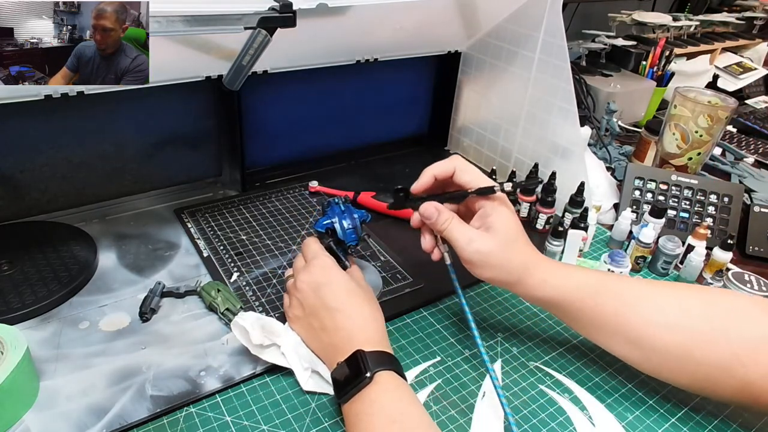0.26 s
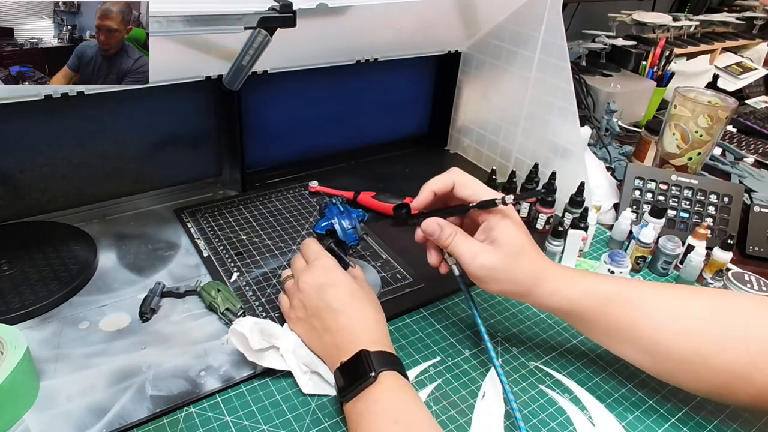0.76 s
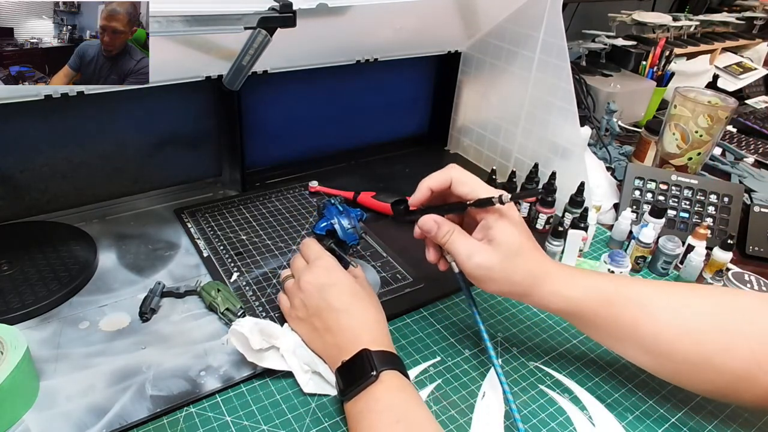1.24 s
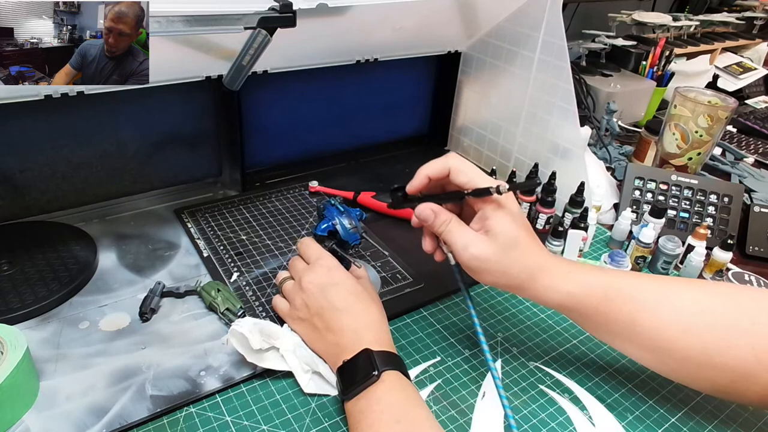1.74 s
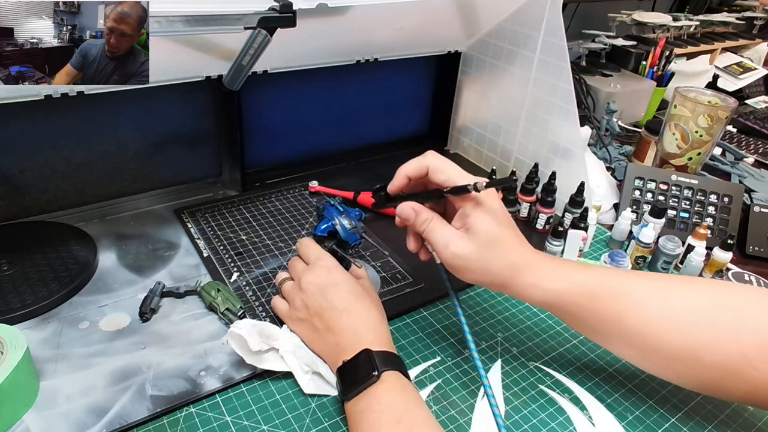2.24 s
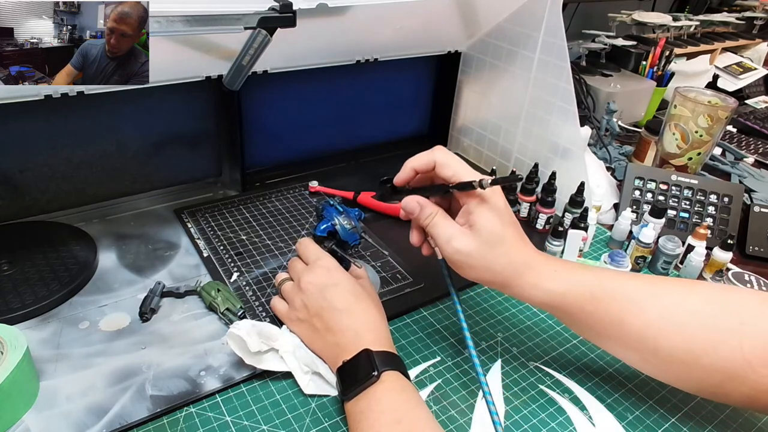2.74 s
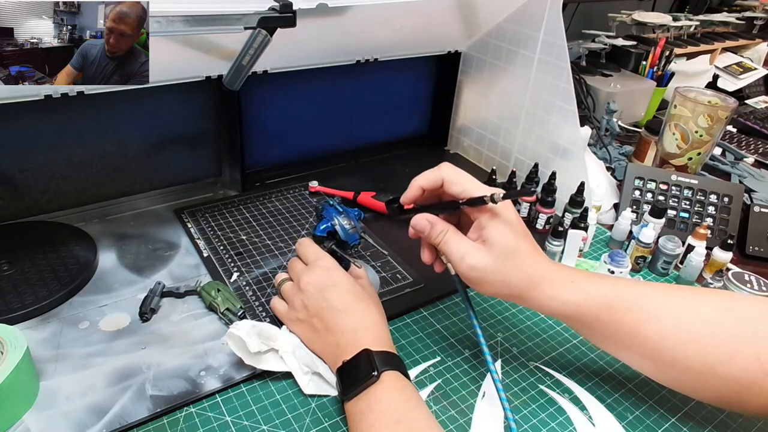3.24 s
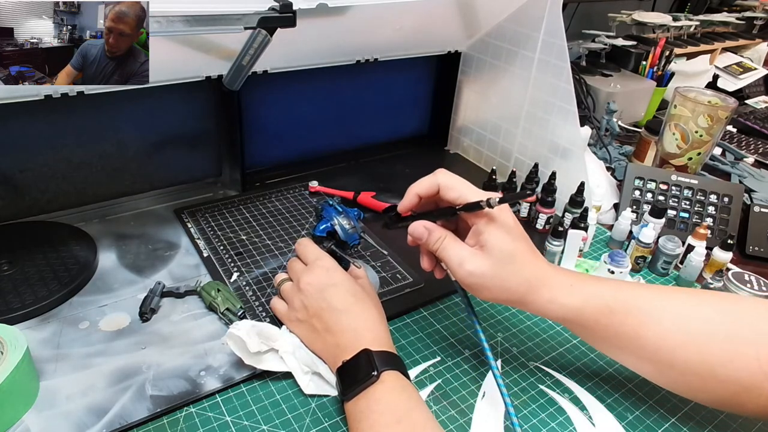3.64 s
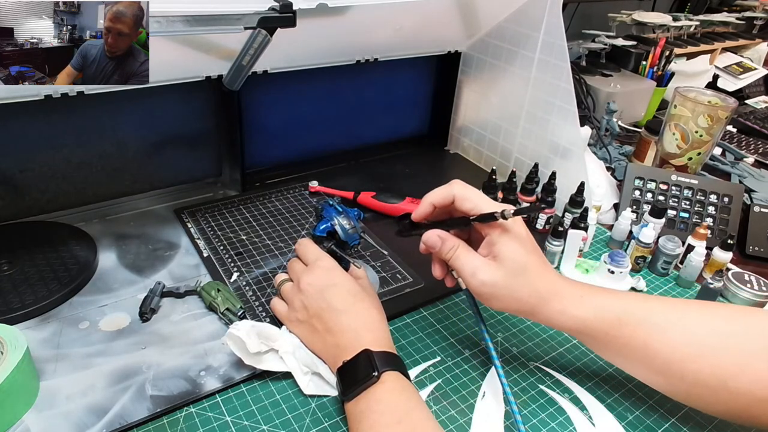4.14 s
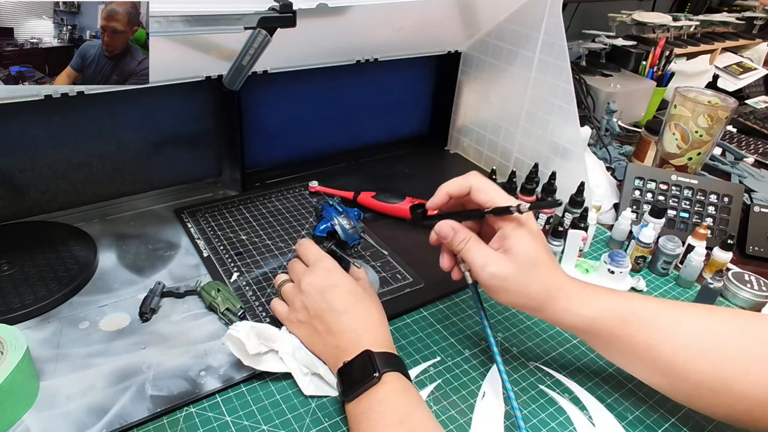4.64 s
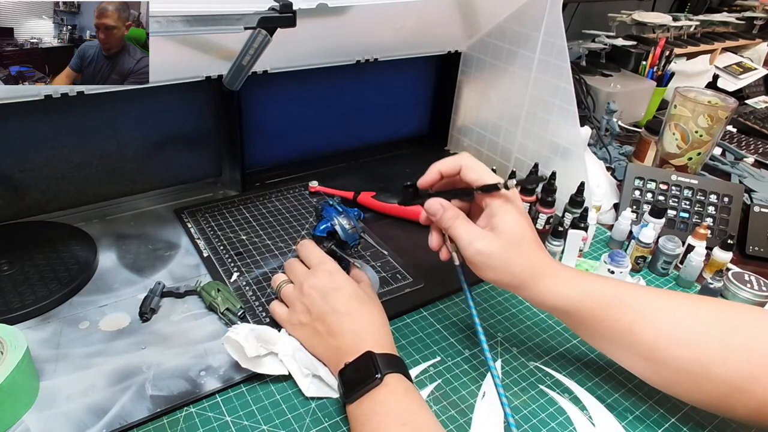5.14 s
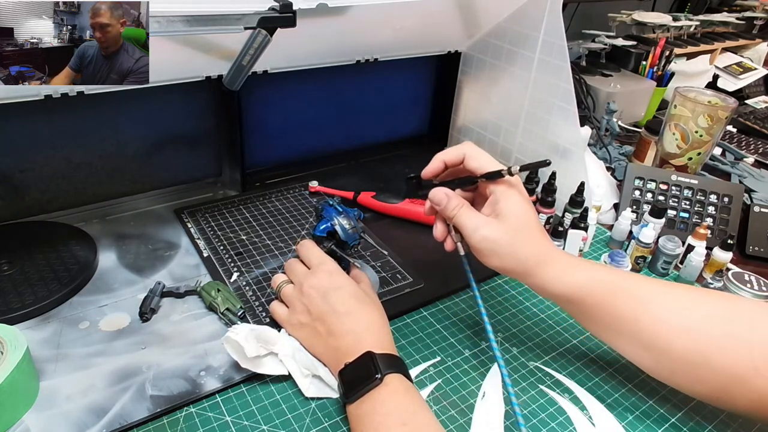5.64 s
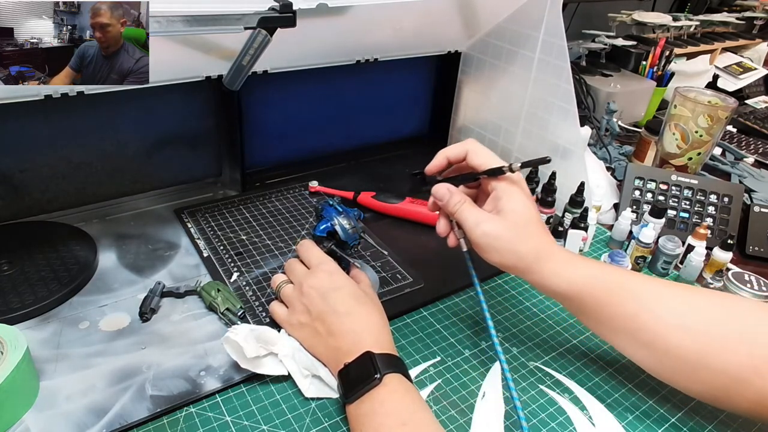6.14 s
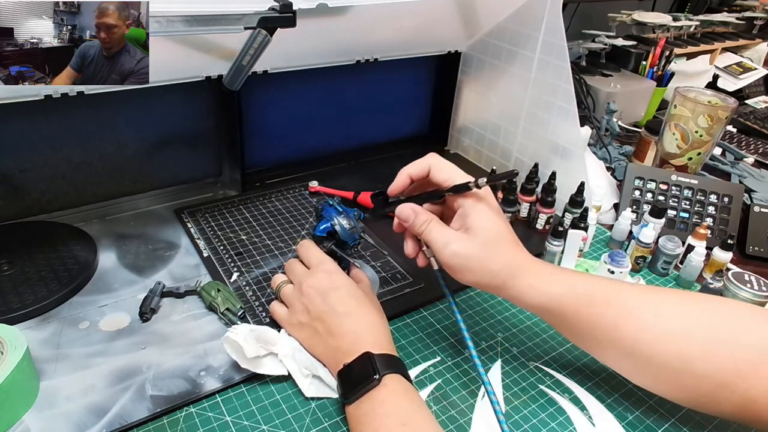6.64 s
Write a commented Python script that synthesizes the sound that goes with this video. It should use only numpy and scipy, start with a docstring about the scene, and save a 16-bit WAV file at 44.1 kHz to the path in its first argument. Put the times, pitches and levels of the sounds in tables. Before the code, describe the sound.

A close mono pickup at a hobby bench, with low room tone, faint steady tones and a thin, warbling electrical whine throughout. The tail of an earlier spray vanishes at the very start. From 0.16 to 0.52 seconds a longer airbrush burst hisses, breathy and hollow against a small part. Short puffs of under a fifth of a second or so follow near 0.9, 1.3, 1.7, 2.2, 2.6, 3.1, 3.5, 4.1, 4.6 and 5.1, then a slightly longer one at 5.4. Each opens with a thin valve chirp, then bright hiss and sizzle, with changing roar. Bursts around 5.1 to 6.2 sound softer and hollower. Soft rubs of the hands fall in some gaps; dull, low bumps appear from 3 seconds. After the 6.1 puff, a light, clustered smack comes near 6.5, then a final crisp burst at 6.73 to 6.95.

```python
"""An airbrush sprays a small plastic part in short bursts, in front of a bench-top spray booth. Mono.
Throughout: room-tone noise, steady sine tones and a frequency-modulated coil whine. An earlier burst dies away first.
Each press: a thin hiss and a chirp of the valve, then shaped noise for jet and paint sizzle, and, a moment later,
roar and breathy hollow notes from the part; swells of band noise, low to high, colour single bursts.
Between bursts: noise rustles, later dull bumps, and near 6.5 s a soft smack of damped modes."""
import sys
import numpy as np
from scipy import signal
from scipy.fft import rfft, irfft, next_fast_len
from scipy.io import wavfile

SR = 44100
rng = np.random.default_rng(int(sys.argv[2]) if len(sys.argv) > 2 else 0)


def dump(signal):
    """Clip the signal to [-1, 1] and save it as 16-bit WAV at the path in sys.argv[1]."""
    limited = np.clip(np.atleast_2d(signal).T, -1, 1)
    pcm = np.round(limited * 32767).astype(np.int16)
    wavfile.write(sys.argv[1], SR, pcm)


N = 303849
TIME = np.arange(N) / SR  # s
FREQS = np.maximum(np.arange(N // 2 + 1) * SR / N, 1)  # Hz

# Trigger presses. Jet, roar, hollow levels and pitch are mid-press; changes run from start to end.
# Sizzle, roar and hollows are relative to the jet.
# valve opens/s, valve shuts/s, lead of thin hiss/s, valve tick/dB, jet/dB, jet change/dB,
# paint sizzle/dB, roar on part/dB, roar change/dB, hollows/dB, hollow pitch/Hz
PRESSES = [(-.2, -.025, .003, -46, -45, -2, -6, -10, 0, -15, 652.2),
           (0.157, 0.517, .0017, -46, -44, -5, -1.5, -1, -14, -7, 703),
           (0.855, 1.033, .0038, -52, -42.5, -4, -3.5, -5.5, -11.5, -8.5, 700),
           (1.257, 1.422, 0.0026, -48, -44, -5, -3, -15, 5, -20, 500.6),
           (1.675, 1.87, 0.0094, -37, -50, -0.5, 1.5, -12.5, -3, -17, 538.6),
           (2.212, 2.389, .004, -41, -43.5, -4.5, -9, -14, 11, -23, 637.4),
           (2.616, 2.823, .0037, -52, -46, -5.5, -6.5, -8.5, -1, -11, 579),
           (3.083, 3.277, 0.004, -42, -44, -7.5, -12, -1.5, 10, -23.5, 852),
           (3.538, 3.749, 0.0055, -39, -42.5, -2, -10, -9, 24, -19.5, 860),
           (4.059, 4.231, 0.0041, -47, -43, -1.5, -10, -5.5, 10, -15.5, 701.6),
           (4.594, 4.745, 0.0015, -46, -43.5, -2.5, -3.5, -4.5, -10, -13, 549.8),
           (5.066, 5.243, .009, -44, -46, 0.5, -4.5, 0.5, 6.5, -3.5, 541.5),
           (5.443, 5.734, 0.0039, -46, -47.5, 2.5, -6.5, -3.5, 4.5, -2.5, 571),
           (6.081, 6.225, 0.018, -48, -47.5, 2, 1.5, -2, -8, 1, 550),
           (6.734, 6.951, 0.0028, -35.5, -43, -1.5, -4.5, -6.5, -10, -11.5, 573)]


def from_db(db):
    """Decibels to amplitude gain."""
    return 10 ** (np.asarray(db) / 20)


def rms_one(x):
    """Scale to rms 1."""
    return x / np.sqrt(np.mean(x ** 2) + 1e-20)


def shape_db(points):
    """Spectrum points interpolated in dB over log frequency."""
    hz, db = np.transpose(points)
    return np.interp(np.log(FREQS), np.log(hz), db)


def noise(gains):
    """Steady Gaussian noise filtered by a gain per frequency; rms 1."""
    size = next_fast_len(N)
    bin_hz = np.arange(size // 2 + 1) * SR / size
    spectrum = rfft(rng.standard_normal(size)) * np.interp(bin_hz, FREQS, gains)
    return rms_one(irfft(spectrum, size)[:N])


def bell(hz, width_hz):
    """Gaussian gain of height 1; falls to exp(-2) at width_hz from the centre."""
    return np.exp(-2 * ((FREQS - hz) / width_hz) ** 2)


def drift(rate_hz):
    """Slow random signal, low-passed at rate_hz; rms 1."""
    return noise(1 / (1 + (FREQS / rate_hz) ** 2))


def coil_whine(swing_hz, spike_hz):
    """A thin tone whose pitch swings once per load cycle and spikes upward four times in it, each time higher."""
    # harmonic multiple, level/dB rms
    harmonics = [(1, -81), (2, -75), (3, -74.5), (4, -80)]
    mean_hz, warble_hz = 3388, 54.6
    cycle = 2 * np.pi * warble_hz * TIME
    load = (warble_hz * TIME + 1 / 8) % 1  # ramp 0-1 that grows the spikes
    spikes = np.cos(2 * cycle) ** 10 * load ** 0.97
    bend_hz = swing_hz * np.cos(cycle) + spike_hz * spikes
    phase = 2 * np.pi * np.cumsum(mean_hz + bend_hz - bend_hz.mean()) / SR
    return sum(np.sqrt(2) * from_db(db) * np.sin(round(k) * phase) for k, db in harmonics)


def background():
    """Room-tone noise and bench electronics: wavering sines and the coil whine."""
    # f/Hz, level before waver/dB rms
    steady_tones = [(1277, -82), (1579, -73), (7998, -86)]
    # room-tone spectrum: f/Hz, relative density/dB
    room_tone = [(20, -36), (40, -27), (55, 0), (95, 4), (130, 1), (240, 1), (320, -5), (1000, -5.5),
                 (1700, -10), (2000, -15.5), (3000, -15.5), (3700, -12.5), (4900, -17.5), (5800, -20.5),
                 (12000, -19), (16000, -27)]
    tones = sum(np.sqrt(2) * from_db(db) * np.sin(2 * np.pi * hz * TIME) for hz, db in steady_tones)
    tones *= from_db(1.3 * drift(5))
    whine = coil_whine(swing_hz=52, spike_hz=650)
    return tones + whine + from_db(-68.1) * noise(from_db(shape_db(room_tone)))


def valve(lag_s, rise_s, fall_s, early=False):
    """Air flow 0-1: linear rise at each press (early: with the thin hiss), exponential fall as the nozzle empties."""
    flow = np.zeros(N)
    for start, stop, lead, *_ in PRESSES:
        opening = np.clip((TIME - start + early * lead - lag_s) / rise_s, 0, 1)
        flow += opening * np.exp(-np.clip((TIME - stop) / fall_s, 0, 20))
    return flow


def stroke(middle, change):
    """Even hand motion: a value runs straight through its middle in each press, and straight on to the next press."""
    times = [s for start, stop, *_ in PRESSES for s in (start, stop)]
    ends = np.column_stack([middle - change / 2, middle + change / 2])
    return np.interp(TIME, times, ends.ravel())


def aim():
    """One stroke per press sets the levels of jet, sizzle, roar and hollows, and the hollow pitch."""
    *_, jet_db, jet_change, sizzle_db, roar_db, roar_change, hollow_db, hollow_hz = np.transpose(PRESSES)
    sizzle_follows = 0.93  # share of the jet's dB change that the sizzle takes
    # the jet leaves the hollow that it first met: the note fades and flattens
    hollow_fade_db, hollow_sag_hz = 4.5, 40.34
    return (stroke(jet_db, jet_change),
            stroke(sizzle_db, (sizzle_follows - 1) * jet_change),
            stroke(roar_db, roar_change),
            stroke(hollow_db, -hollow_fade_db),
            stroke(hollow_hz, -hollow_sag_hz))


def hiss_colour_db():
    """Peaks and dips that colour the hiss, summed in dB over frequency."""
    # f/Hz, width/Hz, level/dB
    peaks_and_dips = [(1520, 226, -9.5), (2850, 56, 1), (3928, 400, 6.5), (5280, 130, -2), (6640, 480, -7),
                      (7900, 270, -5), (9070, 190, 1), (10270, 210, -5), (10700, 190, 4), (10900, 310, -2),
                      (12070, 290, -8)]
    return sum(db * bell(hz, width_hz) for hz, width_hz, db in peaks_and_dips)


def reflections(x, sway):
    """Close echoes comb the hiss; the teeth slide as the hand moves."""
    # nearby surfaces: extra path/s, reflection strength
    surfaces = [(.0011, 0.22), (.0023, 0.096), (.0037, .28), (.0058, 0.14)]
    out = x.copy()
    for delay_s, strength in surfaces:
        moving_delay_s = delay_s * (1 + sway * drift(0.23))
        out += strength * np.interp(TIME - moving_delay_s, TIME, x)
    return out / np.sqrt(1 + sum(strength ** 2 for _, strength in surfaces))


def airbrush():
    """Jet hiss, paint sizzle, and turbulence where the air meets the part, all gated by the valve."""
    # four spectra: f/Hz, relative density/dB
    jet_shape = [(200, -16), (600, -7.5), (1500, -28.5), (2100, -0.5), (2700, 0.5), (3400, -0.5),
                 (4900, -0.5), (6200, 2), (6700, -4), (8000, -10), (12000, -32), (16000, -34)]
    sizzle_shape = [(5000, -14), (6400, 1.5), (7300, 3), (8400, 7.5), (9500, 3), (11500, 1), (12600, -3.5),
                    (13400, -12.5), (14800, -29), (16000, -18)]
    roar_shape = [(300, -32), (700, -7), (980, -14.5), (1120, 6), (1260, 5), (1380, -7.5), (1500, -6),
                  (1800, -8), (2150, -6), (3000, -7.5), (5000, -13), (9000, -52)]
    hollow_shape = [(100, -46), (230, -10), (340, -20.5), (430, -3.5), (540, 0), (720, -5.5), (900, -6.5),
                    (1200, -5.5), (2500, -60)]
    jet_db, sizzle_db, roar_db, hollow_db, hollow_hz = aim()
    colour_db = hiss_colour_db()

    jet = from_db(-2.5 + 0.5 * drift(40)) * noise(from_db(shape_db(jet_shape) + colour_db))
    sizzle_gain = from_db(sizzle_db - 1.0 + 1.4 * drift(60))
    sizzle = sizzle_gain * noise(from_db(shape_db(sizzle_shape) + colour_db))

    # eddies make the sound on the part flutter
    eddies = from_db(2.8 * np.tanh(drift(32)))
    roar = from_db(roar_db - 0.92) * noise(from_db(shape_db(roar_shape) + colour_db))

    # a blown hollow gives a breathy note that moves with the aim
    phase = 2 * np.pi * np.cumsum(hollow_hz) / SR
    note = rms_one(drift(96) * np.cos(phase) + drift(90) * np.sin(phase))
    breath = noise(from_db(shape_db(hollow_shape)))
    hollows = from_db(hollow_db) * (from_db(-5.5) * breath + from_db(-3.5) * note)

    air = valve(lag_s=0, rise_s=0.0084, fall_s=0.0039) * (jet + sizzle)
    # the air needs a moment to reach the part
    air += valve(lag_s=0.0023, rise_s=0.0078, fall_s=0.0055) * eddies * (roar + hollows)
    # the barely open valve sings thinly, from before the full flow until after it
    seat_flow = valve(lag_s=0, rise_s=0.0082, fall_s=0.024, early=True)
    seat = from_db(-7.5) * seat_flow * noise(bell(hz=5000, width_hz=1700))
    return reflections(from_db(jet_db) * (air + seat), sway=0.0536)


def room(x, first_echo_s):
    """Short diffuse tail of the cluttered workshop: exponentially decaying noise of unit energy, convolved."""
    t60_s = 0.22
    t = TIME[:SR // 2]
    tail = rng.standard_normal(len(t)) * from_db(-60 * t / t60_s) * (t > first_echo_s)
    return signal.fftconvolve(x, tail / np.linalg.norm(tail))[:N]


def valve_ticks(hz, width_hz, decay_s):
    """The first spurt through the valve is a short bright chirp of band noise."""
    spurts = np.zeros(N)
    for start, _, _, db, *_ in PRESSES:
        rise = np.clip((TIME - start) / 0.002, 0, 1)
        spurts += from_db(db) * rise * np.exp(-np.clip((TIME - start) / decay_s, 0, 20))
    return spurts * noise(bell(hz, width_hz))


def band_swells():
    """Swells of band noise, low to high, narrow to wide, colour single bursts, gated by the valve."""
    # centre t/s, half length/s, f/Hz, width/Hz, level before valve/dB
    burst_bands = [(.23, .091, 1790, 586, -48.5), (.302, 0.39, 11400, 1600, -53),
                   (1.348, 0.048, 2740, 1010, -47), (1.695, .035, 544, 199, -54.5),
                   (1.748, 0.22, 5030, 892, -52.5), (1.78, 0.1, 8800, 1200, -55),
                   (1.797, 0.029, 3000, 587, -53), (2.224, 0.043, 1130, 179, -51),
                   (2.681, 0.013, 940, 500, -44.5), (2.749, 0.012, 990, 400, -48.5),
                   (3.16, 0.037, 1190, 200, -48), (3.545, 0.038, 480, 300, -53),
                   (3.663, 0.024, 990, 614, -44), (3.687, 0.03, 1230, 199, -47),
                   (4.20, 0.032, 6800, 1300, -44.5), (4.685, 0.058, 6696, 1200, -49),
                   (4.663, 0.072, 11800, 1400, -55), (5.172, 0.04, 1200, 160, -44),
                   (5.156, 0.081, 8800, 1106, -49), (5.18, 0.046, 1893, 400, -51.5),
                   (5.626, 0.065, 9900, 3000, -49), (2.76, .09, 5230, 1100, -50),
                   (5.632, 0.19, 5860, 900, -51), (6.096, .02, 1185, 298, -45),
                   (6.162, .049, 392, 199, -60.5), (6.821, 0.14, 11400, 1400, -53.5)]
    out, colour = np.zeros(N), from_db(hiss_colour_db())
    for s, half_s, hz, width_hz, db in burst_bands:
        swell = np.exp(-np.minimum(((TIME - s) / half_s) ** 2, 20))
        out += from_db(db) * swell * noise(colour * bell(hz, width_hz))
    return out * valve(lag_s=0.0029, rise_s=0.0042, fall_s=0.0054)


def rustles(grain_db):
    """The hands shift their grip: a soft rub of noise with uneven level."""
    # centre t/s, half length/s, level before grain/dB
    rubs = [(0.66, 0.044, -67), (0.753, .03, -66.5), (1.513, 0.072, -65), (1.62, .025, -68.5),
            (1.979, 0.041, -63.5), (2.904, .04, -67), (3.054, 0.038, -65), (4.93, .055, -63.5),
            (5.378, .04, -69.5)]
    # f/Hz, relative density/dB
    rub_shape = [(300, -16), (600, -2), (1000, -0.5), (1600, -6), (2500, -13), (3800, -12.5), (6000, -28),
                 (10000, -38)]
    swells = sum(from_db(db) * np.exp(-((TIME - s) / half_s) ** 2) for s, half_s, db in rubs)
    grain = from_db(grain_db * np.tanh(drift(40)))
    return swells * grain * noise(from_db(shape_db(rub_shape)))


def bumps(hz, width_hz):
    """The bench top booms faintly under the hands: low band noise in Gaussian swells."""
    # centre t/s, half length/s, level/dB
    hand_bumps = [(3.003, 0.022, -63.5), (4.337, 0.034, -72), (4.524, 0.098, -63.5), (5.439, 0.04, -62.5),
                  (6.011, 0.047, -61), (6.784, 0.022, -55.5)]
    swells = sum(from_db(db) * np.exp(-((TIME - s) / half_s) ** 2) for s, half_s, db in hand_bumps)
    return noise(bell(hz, width_hz)) * swells


def ring(clicks, hz, t60_s):
    """Two-pole resonator: a unit click starts a decaying sine of initial height 1."""
    radius, w = from_db(-60 / (t60_s * SR)), 2 * np.pi * hz / SR
    return signal.lfilter([0, np.sin(w)], [1, -2 * radius * np.cos(w), radius * radius], clicks + 1e-18)


def smack(soft_hz):
    """Tiny soft contacts in a row ring a low and a high group of damped modes, each within its own band."""
    # t/s, low strike/dB, high strike/dB
    contacts = [(6.485, -66, -56), (6.495, -66, -51), (6.4985, -62, -50), (6.502, -60, -47),
                (6.516, -66, -55), (6.527, -52, -50), (6.5295, -42, -43), (6.539, -47, -51),
                (6.547, -47, -60)]
    # two mode groups: f/Hz, level relative to strike/dB, t60/s
    low_modes = [(575, 1.5, 0.085), (1330, 1, 0.026)]
    high_modes = [(1894, 1, 0.041), (2320, -2.5, 0.031), (2640, -3, 0.013)]
    s, low_db, high_db = np.transpose(contacts)
    groups = [(low_modes, low_db, [400, 1150]), (high_modes, high_db, [1600, soft_hz])]
    out = np.zeros(N)
    for modes, strike_db, band_hz in groups:
        clicks = np.zeros(N)
        clicks[(s * SR).astype(int)] = from_db(strike_db)
        # modes alternate in sign
        rings = sum((-1) ** k * from_db(db) * ring(clicks, hz, t60_s)
                    for k, (hz, db, t60_s) in enumerate(modes))
        band = signal.butter(4, band_hz, "band", fs=SR, output="sos")
        out += signal.sosfilt(band, rings)
    return out


def scene():
    """Everything at the bench, alike in both channels."""
    near = airbrush() + band_swells() + valve_ticks(hz=5030, width_hz=610, decay_s=0.0078)
    near += smack(soft_hz=2730) + rustles(grain_db=2)
    mono = near + from_db(-12) * room(near, first_echo_s=0.0071)
    mono += bumps(hz=96.0, width_hz=14.5) + background()
    return np.array([mono, mono])


def record(dry):
    """The microphone drops the deep bass; a steep elliptic low-pass cuts the top."""
    bass_cut = signal.butter(4, 42, "high", fs=SR, output="sos")
    top_cut = signal.ellip(10, 0.1, 80, 15500, fs=SR, output="sos")
    return signal.sosfilt(top_cut, signal.sosfilt(bass_cut, dry))


dry = scene()
out = record(dry)
dump(out)
```